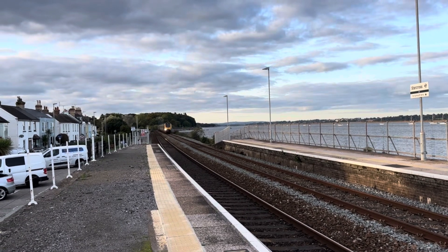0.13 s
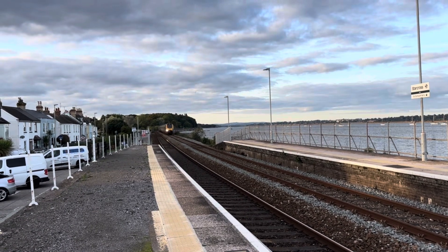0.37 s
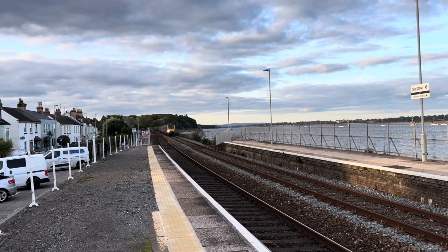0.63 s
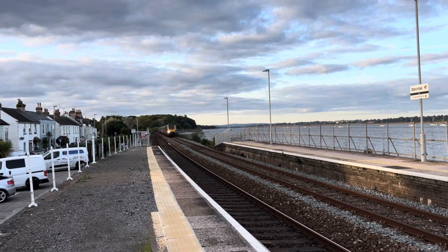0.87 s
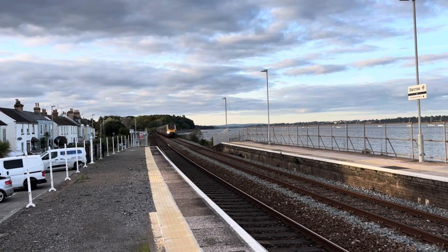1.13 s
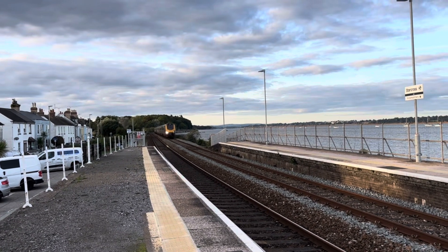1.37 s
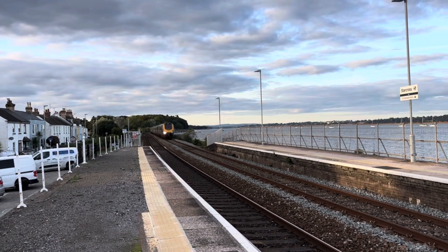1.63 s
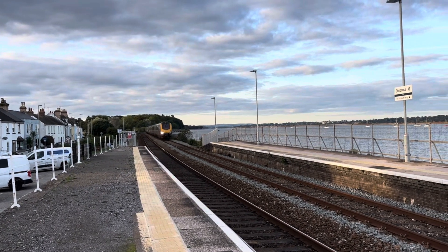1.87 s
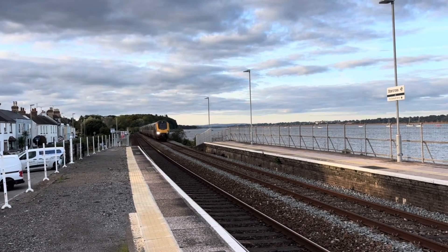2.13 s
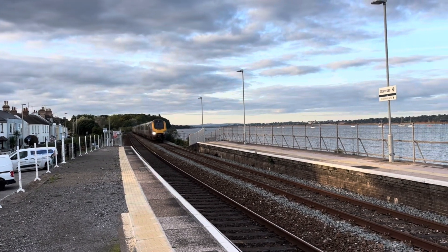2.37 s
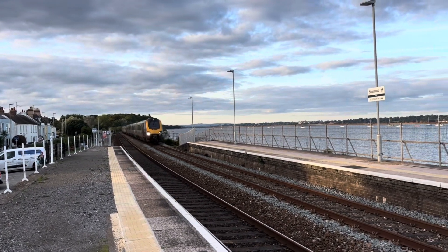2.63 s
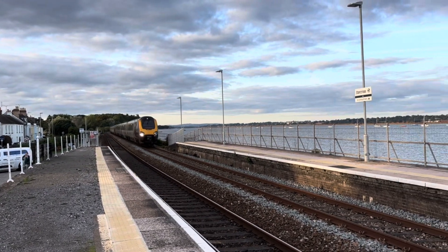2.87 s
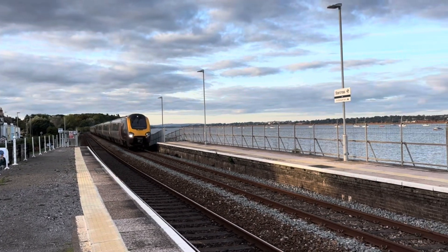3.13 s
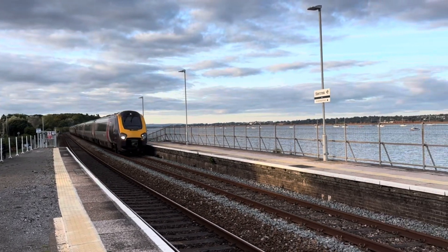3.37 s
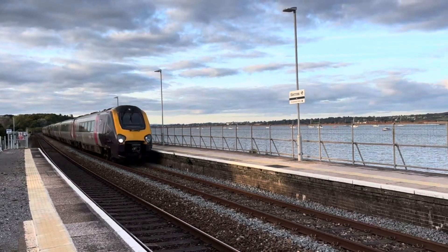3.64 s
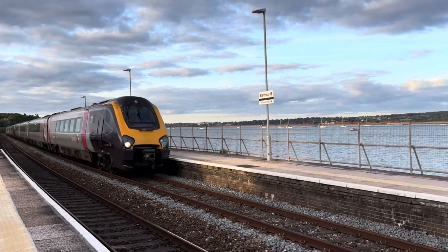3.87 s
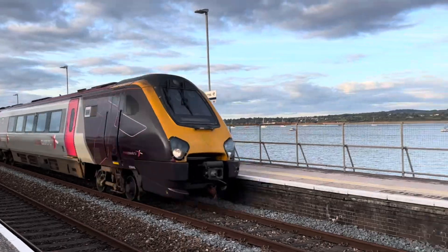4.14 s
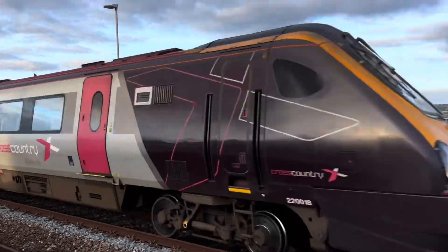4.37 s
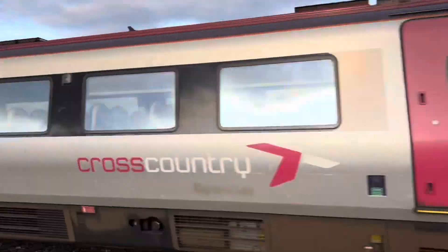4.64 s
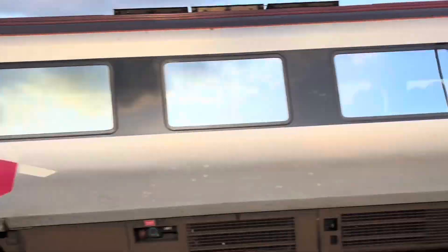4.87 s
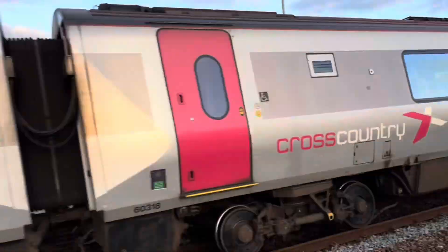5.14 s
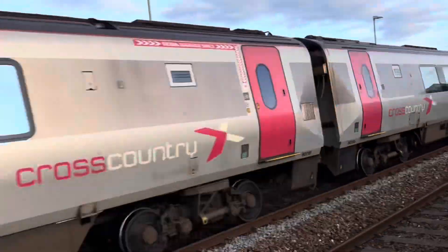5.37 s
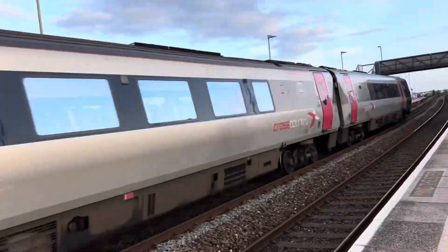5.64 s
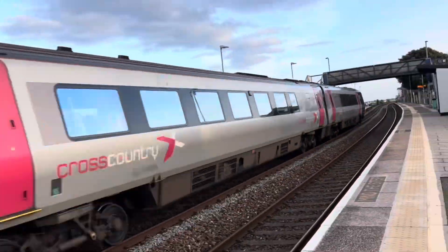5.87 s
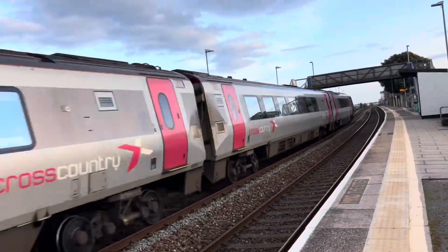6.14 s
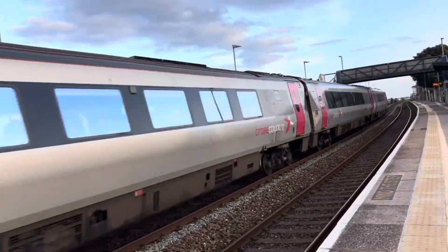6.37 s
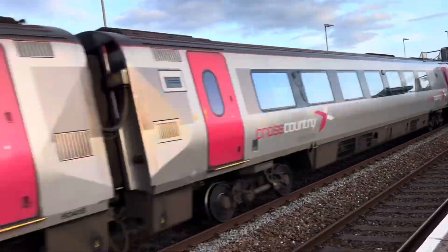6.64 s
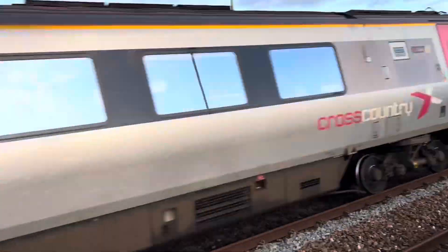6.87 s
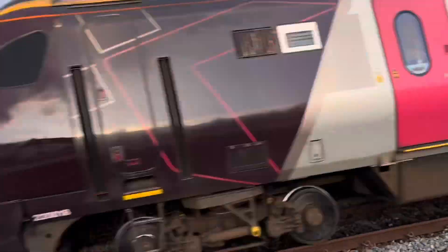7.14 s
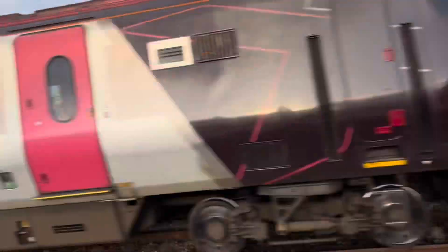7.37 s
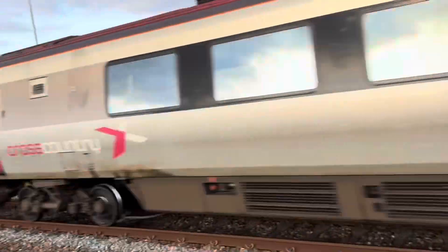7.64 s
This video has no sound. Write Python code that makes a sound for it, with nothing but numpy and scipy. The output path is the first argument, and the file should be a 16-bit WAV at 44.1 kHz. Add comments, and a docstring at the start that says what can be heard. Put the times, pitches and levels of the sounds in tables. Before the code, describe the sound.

A fast diesel train approaches an open seaside platform, swelling from thin metallic rail song to a close, heavy rush of wheels, hums and knocks.

```python
"""A diesel multiple-unit train approaches an open platform and rolls past a few metres away.
Wheels roar as broad noise that follows the train's level; the rails sing ahead of it as narrow noise bands.
Engine orders and whines are tones with Doppler shift; drones, a low thrum and knocks join the passage.
Wind wavelets bump the microphone early on, and two ports hear a partly coherent field."""
import sys
import numpy as np
from scipy import signal
from scipy.io import wavfile
from scipy.ndimage import uniform_filter1d

SR = 44100
rng = np.random.default_rng(int(sys.argv[2]) if len(sys.argv) > 2 else 0)


def int16_out(signal):
    """Quantize to a 16-bit WAV file."""
    q = np.round(np.clip(np.atleast_2d(signal).T, -1, 1) * 32767)
    wavfile.write(sys.argv[1], SR, q.astype(np.int16))


def rack_gain(trim_db):
    """Turn a fader trim in dB into the linear factor to multiply a signal by."""
    fader = np.asarray(trim_db, float)
    return 10 ** (fader / 20)


N = 341775  # samples

SPEED, TRACK_M, SOUND = 32, 7, 343  # train m/s, nearest distance m, sound m/s
GROUND_M = 62  # m, beyond which the ground swallows sound
DRONE_SLIDE = 0.069  # share of pitch above nominal when coming, below it when going

# Track drone that swells as heavy bogies pass: t/s, half-duration to -6 dB/s, level/dB, f/Hz
DRONES = [(4.34, 0.15, -19.5, 491.4), (4.571, 0.046, -20, 470), (4.951, 0.18, -22, 477.5),
          (5.75, 0.22, -26.5, 463.2), (6.349, 0.12, -27, 466.4), (7.1, 0.37, -28.5, 468.5),
          (7.72, 0.12, -26.5, 474)]


def rms_one(x):
    """Normalization: scales to unit mean power."""
    return x / np.sqrt(np.mean(np.abs(x) ** 2) + 1e-20)


def read_spectrum(points, hz):
    """Interpolation along a logarithmic frequency axis."""
    f, value = np.transpose(points)
    return np.interp(np.log(hz + 1), np.log(f + 1), value)


def follow(rows, t):
    """Piecewise-linear envelopes: every column of a table as a function of time."""
    times, *columns = np.transpose(rows)
    return np.array([np.interp(t, times, column) for column in columns])


def wobble(rate_hz, count):
    """Random-phase superposition: slow fluctuation of rms 1, slowest components strongest."""
    f = np.geomspace(rate_hz / 20, rate_hz, count)
    turn = rng.random(count)
    weight = np.sqrt(2 / f / np.sum(1 / f))
    return lambda t: np.sin(2 * np.pi * (np.outer(t, f) + turn)) @ weight


def shake(rate_hz):
    """The same superposition, interpolated to every sample."""
    coarse = np.arange(0, N + 256, 256)
    return np.interp(np.arange(N), coarse, wobble(rate_hz, count=20)(coarse / SR))


def passing(s):
    """Doppler kinematics of a source abreast at s: sending time, distance gain, direction (1 coming)."""
    t = np.arange(N) / SR
    path = np.hypot(SPEED * (t - s), TRACK_M)
    near = TRACK_M / path / (1 + (path / GROUND_M) ** 4)
    return t - path / SOUND, near, SPEED * (s - t) / path


def shape(points, hz):
    """Power spectral density of total power 1: cut below its first point, rolled off above its last."""
    power = rack_gain(2 * read_spectrum(points, hz)) * (hz >= points[0][0])
    above = hz > points[-1][0]
    power[above] *= (points[-1][0] / hz[above]) ** 8
    return power / power.sum()


def mode(f, width_hz, db, hz):
    """Narrow-band resonance: flat-topped power response, width taken at half power."""
    return hz[1] / width_hz / (1 + (2 * (hz[:, None] - f) / width_hz) ** 4) * rack_gain(2 * db)


def swell(t, s, lasting, db):
    """Gaussian envelope in decibels, 6 dB down at lasting seconds either side of s."""
    return np.maximum(db - 6 * ((t - s) / lasting) ** 2, -120)


def roar_power(t, hz):
    """Rolling contact noise: broad spectra, lifted at wheel resonances, track the train's level."""
    # Passing train: t/s, roar level/dB, treble level/dB
    train_levels = [(0.0, -54.5, -57.5), (1.73, -43, -50.5), (2.59, -37, -49.5), (3.13, -32, -47),
                    (3.65, -28, -44.5), (4.08, -21.5, -41.5), (4.3, -20, -41.5), (4.6, -18, -32.5),
                    (5.01, -20.5, -33.5), (5.48, -22.5, -40.5), (6.03, -26, -36.5), (6.3, -28, -41.5),
                    (6.75, -24, -38.5), (7.04, -24, -39.5), (7.3, -23.5, -37), (7.53, -25.5, -42),
                    (7.75, -24.5, -38)]
    # Wheel resonances: f/Hz, width/Hz, lift/dB
    wheel_lifts = [(887, 100, 6.5), (2275, 92, 2), (4050, 60, 1.5), (4870, 100, 3.5), (6640, 350, 3)]
    # Lowest rumble: f/Hz, relative level per Hz/dB
    rumble = [(30, -30), (42, -8), (52, 8), (62, 9), (75, -20)]
    # Low boom: f/Hz, relative level per Hz/dB
    boom = [(60, 0.5), (90, -0.5), (140, -5), (200, -1.5), (300, -6.5), (400, -4.5), (600, -16)]
    # Noise around the track drone: f/Hz, relative level per Hz/dB
    drone_noise = [(410, -22), (450, -7), (473, 0), (498, -6), (560, -20)]
    # Mid-range roar: f/Hz, relative level per Hz/dB
    roar = [(350, -22), (560, -7.5), (700, -9), (1100, -8), (1500, -14.5), (2200, -22.5)]
    # Hiss: f/Hz, relative level per Hz/dB
    hiss = [(1000, -3), (1600, 4), (2300, 0), (3000, -2.5), (4500, -6), (7000, -9), (9000, -8)]
    # Highest fizz: f/Hz, relative level per Hz/dB
    fizz = [(8500, -13), (10000, -3), (13000, -1.5), (15800, -2.5)]
    # Spectrum, level at reference before lift/dB, share of roar change, share of treble change
    layers = [(rumble, -29.5, 0.56, 0), (boom, -19, 0.96, 0), (drone_noise, -25, 1.22, 0),
              (roar, -19, 1.145, 0), (hiss, -21, 0.92, 0.41), (fizz, -27, 0, 1.19)]
    lift = rack_gain(2 * sum(db / (1 + (2 * (hz - f) / w) ** 2) for f, w, db in wheel_lifts))
    reference_db = np.array([[-20], [-33]])  # roar, treble
    roar_db, treble_db = follow(train_levels, t) - reference_db
    power = 0
    for points, db, roar_share, treble_share in layers:
        layer_db = db + roar_share * roar_db + treble_share * treble_db
        power = power + np.outer(shape(points, hz) * lift, rack_gain(2 * layer_db))
    return power


def rail_power(t, hz):
    """Waveguide propagation: rails carry vibration far ahead of the train in surging modes."""
    # Rail song ahead of the train: t/s, low-mode level/dB, middle-mode level/dB, high-mode level/dB
    song_levels = [(0.0, -65, -68, -72), (0.26, -57, -63.5, -66), (0.46, -58, -67, -60),
                   (0.56, -58, -59, -61), (0.97, -48, -56.5, -59), (1.43, -50.5, -50.5, -51),
                   (2.75, -38.5, -53.5, -46), (3.7, -36, -54, -39.5)]
    # Rail modes: f/Hz, width/Hz, level relative to the song/dB
    rail_modes = [(1025, 240, 0), (1347, 71, 2.5), (1783, 32, 7), (2650, 40, -16), (6520, 37, -14),
                  (6730, 78, -10), (7140, 180, -7.5)]
    # the train's weight damps the rail as it arrives, by 40 dB a second
    damped_db = -40 * np.clip(t - song_levels[-1][0], 0, 2)
    low_db, middle_db, high_db = follow(song_levels, t) + damped_db
    ladder = [(k * 463.2, 60, -12) for k in range(20, 33)]  # faint overtones high in the song
    power = 0
    for f, width_hz, db in rail_modes + ladder:
        if f < 1200:
            song_db = low_db
        elif f < 1500:
            song_db = (low_db + middle_db) / 2
        elif f < 3000:
            song_db = middle_db
        else:
            song_db = high_db
        surge_db = 1.5 * wobble(12, count=20)(t)  # each mode surges unevenly
        power = power + mode(f, width_hz, db + surge_db + song_db, hz)
    return power


def swell_power(t, hz):
    """Transient resonance: single noise bands rise and fall, the drones sliding down in pitch."""
    # One wheel ringing: t/s, half-duration to -6 dB/s, level/dB
    wheel_rings = [(5.86, .12, -32), (6.2, .15, -39), (6.5, .07, -32)]
    # Noise bands swelling as the train nears and passes: t/s, half-duration/s, f/Hz, width/Hz, level/dB
    rushes = [(3.13, 0.51, 107, 82, -28.5), (2.69, 0.42, 940, 36, -38.5), (4.32, .13, 1800, 1000, -23),
              (4.27, .1, 7000, 5900, -31), (4.83, 0.059, 3600, 1400, -25), (4.73, .3, 197, 47, -21.5),
              (7.2, 0.35, 950, 600, -25)]
    power = 0
    for s, lasting, db in wheel_rings:
        power = power + mode(2205, 55, swell(t, s, lasting, db), hz)
    for s, lasting, db, f in DRONES:
        way = SPEED * (s - t) / np.hypot(SPEED * (s - t), TRACK_M)
        power = power + mode(f * (1 + DRONE_SLIDE * way), 94, swell(t, s, lasting, db), hz)
    for s, lasting, f, width_hz, db in rushes:
        power = power + mode(f, width_hz, swell(t, s, lasting, db), hz)
    return power


def rolling():
    """Spectral synthesis: Gaussian noise takes the summed power of wheels, rails and swells."""
    size, hop = 2048, 256
    frames, hz = N // hop + 9, np.fft.rfftfreq(size, 1 / SR)
    t = np.arange(frames) * hop / SR
    power = roar_power(t, hz) + rail_power(t, hz) + swell_power(t, hz)
    real, imaginary, patches = rng.standard_normal((frames, len(hz), 3)).T
    # drifting patches, 1 dB rms
    patches = uniform_filter1d(patches, size=20, axis=0)
    patches_db = rms_one(uniform_filter1d(patches, size=16, axis=1))
    flicker_db = 0.4 * wobble(14, count=30)(t)  # all of this noise flickers at random
    treble_flicker_db = np.outer(hz > 7000, 1.65 * wobble(12, count=30)(t))  # the treble flickers more
    z = (real + 1j * imaginary) * np.sqrt(power) * rack_gain(patches_db + flicker_db + treble_flicker_db)
    return signal.istft(z, nperseg=size, noverlap=size - hop)[1][:N] * np.sqrt(8 / 3)


def engines():
    """Doppler effect: shaft orders from each coach fall in pitch as the path shrinks, then grows."""
    # One engine a coach: t abreast/s, shaft f/Hz, relative exhaust level/dB, openness of the way ahead/0-1
    coach_engines = [(4.6, 31.2, -6, 1), (5.33, 31.0, 0, .4), (6.0, 31.0, -17, 0), (6.7, 30.8, -8, 0),
                     (7.8, 30.8, -7, 0)]
    # Shaft orders: multiple of shaft f, level thrown ahead/dB, level thrown sideways/dB
    shaft_orders = [(3, -14, -18), (4, -19, -24), (5, -19, -30), (6, -6, -21.5), (7, -21, -28),
                    (8, -21, -24)]
    out = np.zeros(N)
    for s, shaft_hz, exhaust_db, open_ahead in coach_engines:
        sent, near, way = passing(s)
        ahead = open_ahead * np.clip(way, 0, 1) ** 2
        blocked = np.where(way < 0, 1, 1 - open_ahead)
        behind_db = -8 * way ** 2 * blocked
        for order, ahead_db, side_db in shaft_orders:
            thrown_db = side_db + (ahead_db - side_db) * ahead
            db = exhaust_db + behind_db + thrown_db + shake(6)
            phase = 2 * np.pi * (order * shaft_hz * sent + rng.random()) + .3 * shake(8)
            out += near * rack_gain(db) * np.cos(phase)
    return out


def whines():
    """Doppler effect with phase modulation: thin, unsteady tones slide down as they pass."""
    # Turbo and motor whines: t abreast/s, f/Hz, level abreast/dB
    whine_tones = [(4.58, 8630, -43), (4.6, 1720, -32)]
    out = np.zeros(N)
    for s, hz, db in whine_tones:
        sent, near, _ = passing(s)
        phase = 2 * np.pi * hz * sent + 2.5 * shake(150)
        out += near * rack_gain(db + 4 * shake(20)) * np.cos(phase)
    return out


def hums():
    """Phase integration: firm, wavering tones form the low thrum and the core of the track drone."""
    # Swells of the low thrum: t/s, half-duration to -6 dB/s, level/dB
    thrums = [(2.72, 0.041, -31.5), (3.04, .05, -25), (3.78, 0.15, -23), (4.2, 0.2, -20), (4.58, .08, -19),
              (5.74, 0.11, -24.5), (6.06, 0.042, -27), (7.17, .07, -30)]
    out, t = np.zeros(N), np.arange(N) / SR
    tones = [(s, lasting, db, 56.8) for s, lasting, db in thrums]  # last is Hz
    tones += [(s, lasting, db - 2, hz) for s, lasting, db, hz in DRONES]  # core 2 dB under the noise
    for s, lasting, db, hz in tones:
        way = passing(s)[2]
        turns = np.cumsum(hz * (1 + DRONE_SLIDE * way)) / SR + rng.random()
        level_db = db - 6 * ((t - s) / lasting) ** 2 + 2 * shake(20)
        out += np.sqrt(2) * rack_gain(level_db) * np.cos(2 * np.pi * turns + .5 * shake(20))
    return out


def add(mix, s, sound):
    """Superposition: adds a sound from time s on."""
    part = mix[round(s * SR):][:len(sound)]
    part += sound[:len(part)]


def clatter():
    """Damped vibration: knocks of loose metal are band noise with exponential decay."""
    # Clatter between coupled cab ends: t/s, level before decay/dB, f/Hz
    clacks = [(7.197, -11, 930), (7.329, -13, 1130), (7.37, -12.5, 910)]
    t60, width_hz = 0.053, 420  # decay time s, band width Hz
    out, t = np.zeros(N), np.arange(4000) / SR
    for s, db, hz in clacks:
        edges = [hz - width_hz / 2, hz + width_hz / 2]
        sos = signal.butter(2, edges, "band", fs=SR, output="sos")
        knock = rms_one(signal.sosfilt(sos, rng.standard_normal(4000)))
        add(out, s, rack_gain(db - 60 * t / t60) * knock)
    return out


def wind():
    """Turbulent pressure at the microphone: saturated low wavelets sag in pitch."""
    # Wind bumps: t/s, level before blunting/dB, mean f/Hz, length/cycles
    wind_bumps = [(0.363, -31, 130, 1.9), (0.474, -31, 260, 4.5), (0.677, -32, 64.6, 1.4),
                  (0.848, -28.5, 110, 3.9), (1.041, -32, 168, 4.2), (1.619, -18.5, 115, 4.3),
                  (1.663, -20.5, 137, 2), (1.736, -19.5, 105, 1.7), (1.685, -26.5, 75, 3.5),
                  (2.203, -23, 185, 4.3), (0.31, -32, 90, 1.6), (0.801, -33, 130, 3.5),
                  (2.17, -24, 75, 1.7)]
    out = np.zeros(N)
    for s, db, hz, cycles in wind_bumps:
        u = np.arange(0, 1, hz / cycles / SR)  # progress through the wavelet
        envelope = np.sin(np.pi * np.sqrt(u)) ** 2
        blunt_wave = np.tanh(1.7 * np.sin(2 * np.pi * cycles * u ** 0.624))
        add(out, s, rack_gain(db) * envelope * blunt_wave)
    return out


def click():
    """Impulsive excitation: one small dry click of smoothed, rapidly decaying noise."""
    out = np.zeros(N)
    noise = uniform_filter1d(rng.standard_normal(60), size=4)
    add(out, .2111, rack_gain(-25) * noise * np.exp(-np.arange(60) / 15))
    return out


def two_ports(field):
    """Spatial coherence: the ports share part of the field, with a phase lead; scattered sound differs."""
    # Field common to both ports, before scattered sound is raised: f/Hz, coherence/0-1
    coherence = [(100, 0.97), (350, 0.93), (700, 0.84), (1200, 0.49), (1700, 0.41), (2400, 0.72),
                 (4100, 0.68), (5500, 0.031), (6300, 0.6), (7000, 1)]
    # Bearing of the train below 1900 Hz: t/s, lead of the right port/us
    bearing = [(0, 152), (2.5, 170), (4, 93), (4.8, -100), (5.5, -200)]
    # Phase lead from the body of the phone: f/Hz, phase/rad
    case_phase = [(1900, -0.094), (2200, 1), (2800, -1.2), (4800, -0.62), (7300, 0.09)]
    turn_hz, period_hz = 7250, 5600  # above the first, port phase turns once every period
    hz, t, z = signal.stft(field, SR, nperseg=1024, noverlap=768)
    same = np.clip(read_spectrum(coherence, hz), 0, 1)[:, None]
    size = np.sqrt(uniform_filter1d(abs(z) ** 2, size=5, axis=1))
    scattered = size * np.exp(2j * np.pi * rng.random(z.shape)) * 1.78
    lead_s = np.interp(t, *np.transpose(bearing)) * 1e-6
    travel = np.outer(hz * (hz < 1900), lead_s)
    high = np.maximum(hz - turn_hz, 0) / period_hz
    # the turn runs slightly unevenly, slower near phase and antiphase
    high -= 0.11 * np.sin(4 * np.pi * high) / (4 * np.pi)
    turns = travel + high[:, None]
    lead = np.exp(1j * (2 * np.pi * turns + read_spectrum(case_phase, hz)[:, None]))
    right = lead * (same * z + np.sqrt(1 - same ** 2) * scattered)
    return signal.istft(np.array([z, right]), SR, nperseg=1024, noverlap=768)[1][:, :N]


def scene():
    """Superposition: all sources sum to one sound field heard at two ports."""
    field = rolling() + engines() + whines() + hums() + clatter() + wind() + click()
    return two_ports(field)


def band_limit(x):
    """A steep low-pass at the top of the band."""
    return signal.sosfilt(signal.butter(12, 15780, fs=SR, output="sos"), x)


def record(dry):
    """High-pass filtering and soft saturation: microphone low cut at 38 Hz, then a smooth ceiling."""
    cut = signal.sosfilt(signal.butter(4, 38, "high", fs=SR, output="sos"), dry)
    ceiling = cut / (1 + cut ** 4) ** .25
    return band_limit(ceiling)


dry = scene()
out = record(dry)
int16_out(out)
```